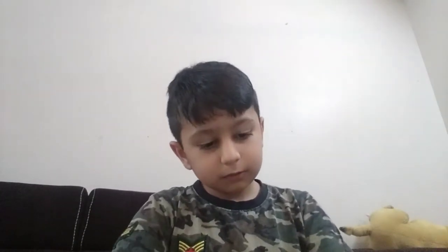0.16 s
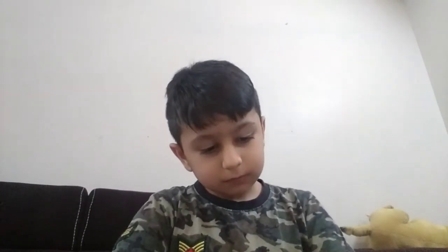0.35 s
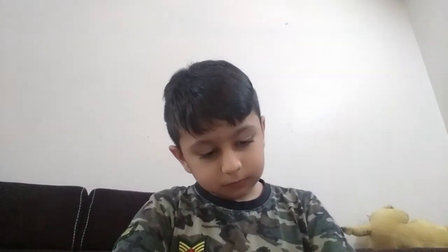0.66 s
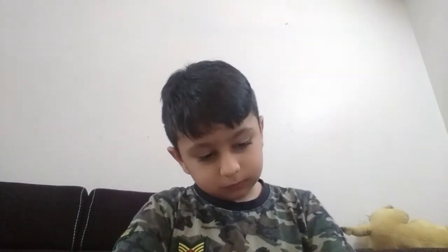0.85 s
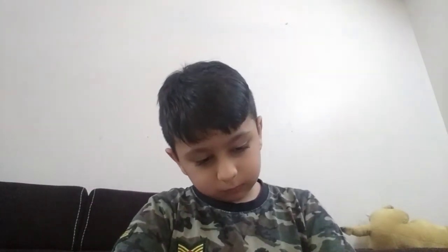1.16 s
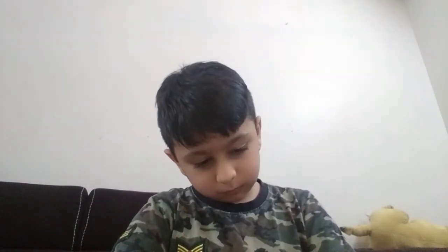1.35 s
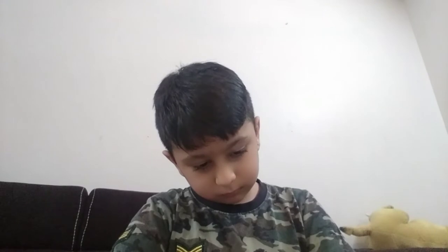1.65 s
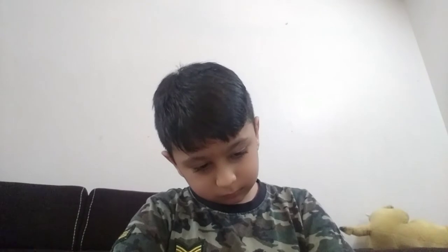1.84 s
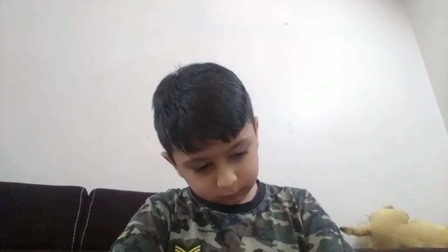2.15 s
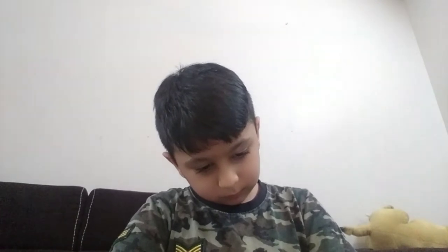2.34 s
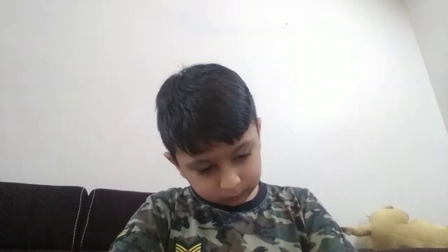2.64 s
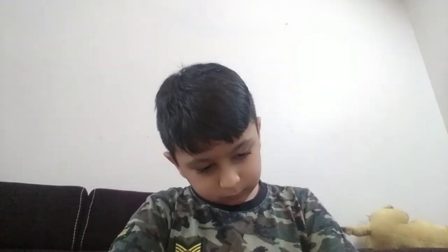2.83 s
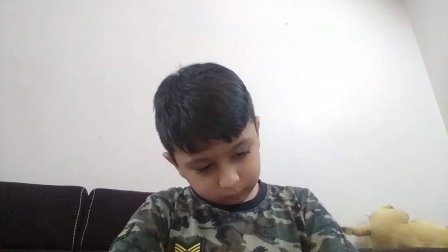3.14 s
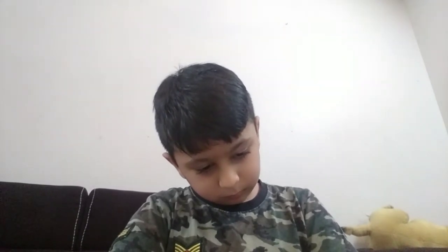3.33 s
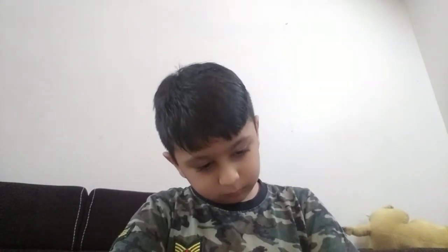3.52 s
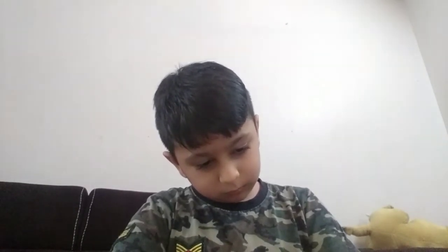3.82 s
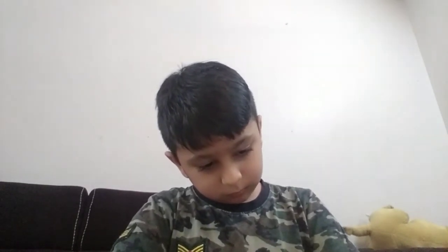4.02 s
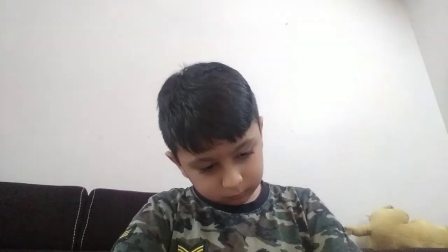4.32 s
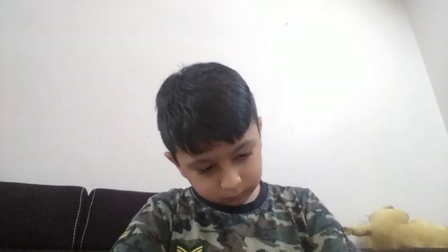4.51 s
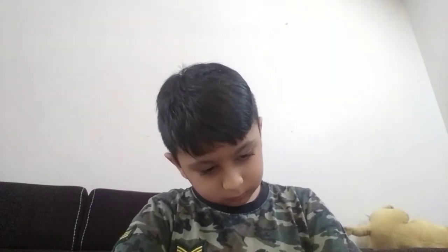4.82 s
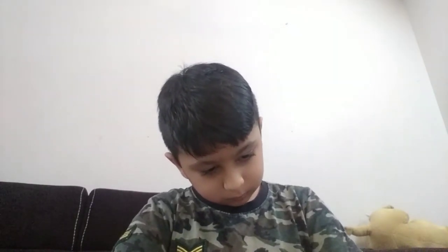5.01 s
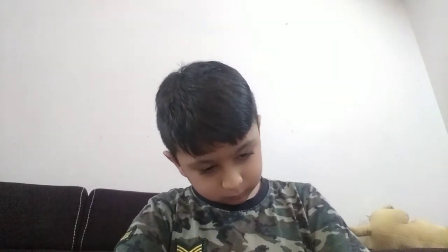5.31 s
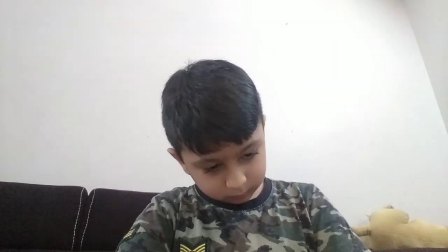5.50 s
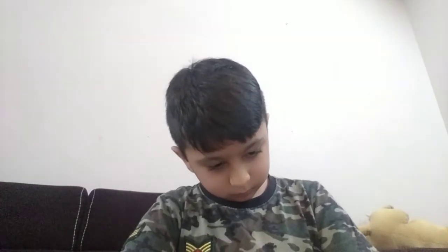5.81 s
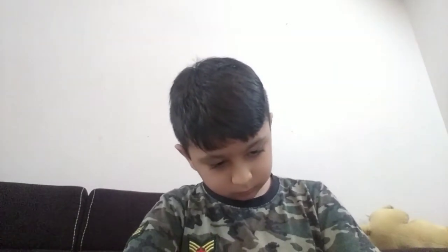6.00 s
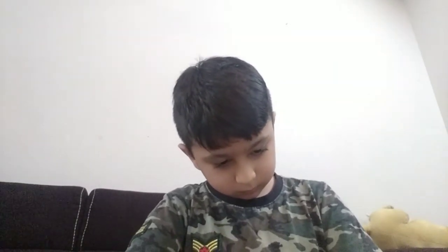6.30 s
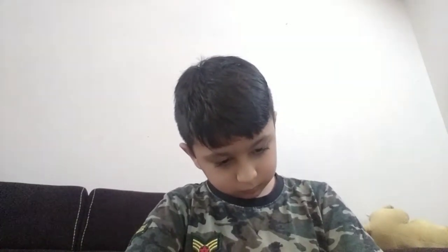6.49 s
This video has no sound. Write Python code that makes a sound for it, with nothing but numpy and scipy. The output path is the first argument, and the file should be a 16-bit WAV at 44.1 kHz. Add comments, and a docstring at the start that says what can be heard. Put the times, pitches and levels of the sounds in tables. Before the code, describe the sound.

A felt-tip pen knocks on a table, then scribbles rapidly on paper, pausing briefly midway and knocking again near the end.

```python
"""In a small, quiet room a felt-tip pen knocks on a table and rattles, then scribbles on paper, pushed and
pulled in turn about nine times a second. Its fibres catch and slip: the tilted nib hisses, at first much
brighter when pushed, it judders and squeaks, and the table murmurs under the rubbing and sways at bumps.
Just past halfway the pen pauses, lands with a light rattle and scribbles on.
Near the end it knocks hard and rattles once more."""
import sys
import numpy as np
from scipy import signal
from scipy.fft import rfft, irfft, next_fast_len
from scipy.io import wavfile
from scipy.ndimage import uniform_filter1d, map_coordinates

SR = 44100
rng = np.random.default_rng(int(sys.argv[2]) if len(sys.argv) > 2 else 0)


def transcribe(u):
    """Save the signal u as a 16-bit wav file named by the first command-line argument.

    u: samples, shape (n,) or (channels, n), limited to [-1, 1]; the rate is SR.
    q: integer samples, one column per channel.
    """
    v = np.clip(np.atleast_2d(u).T, -1, 1)
    q = np.round(v * 32767).astype(np.int16)
    wavfile.write(sys.argv[1], SR, q)


N = 293706


def scribble(bite_s=0.0015, brake=2.28, ease=1.26):
    """Sliding friction: each stroke bites, speeds along and slows, driving hiss, rasp and murmur."""
    low, high, top, drag, murmur, speed = np.zeros((6, N))
    for stroke in strokes():
        s, length, lean_db, bite = stroke["s"], stroke["length"], stroke["lean_db"], stroke["bite"]
        t = np.arange(int(length * SR)) / SR
        attack = bite * np.tanh(t / bite_s) + (1 - bite) * np.tanh(t / stroke["rise"]) ** 2
        friction = unit(attack * (1 - (t / length) ** brake) ** ease)
        arc = np.abs(np.sin(np.pi * t / length))
        dark, bright = amp(stroke["db"]) * unit(amp([-lean_db / 2, lean_db / 2]))
        add(speed, s, arc * amp(-0.3 * lean_db))  # leaning into the paper holds the nib back
        add(low, s, friction * dark)
        add(high, s, friction * bright)
        add(top, s, friction * bright * amp(stroke["treble_db"]))
        add(drag, s, friction * amp(stroke["rasp_db"]))
        add(murmur, s, friction * amp(stroke["murmur_db"]) * np.sqrt(arc))
    rubbing = amp(-0.57) * nib_hiss(low, high, top, speed) + felt_rasp(drag, speed)
    rubbing += amp(-5.0) * table_murmur(murmur)
    tooth = amp(1.37 * wobble(70) + 0.57 * wobble(450))  # the paper's tooth makes the grip uneven
    return tooth * rubbing


def strokes(contact_share=0.93, longest_s=0.11, upright_db=-2, pull_tilt_share=0.26, dig_db=0.57):
    """Reciprocating motion: direction and grip set the attack and colour of each stroke's friction."""
    # Pushes and pulls in turn. Each row: start in seconds, hiss level in dB.
    hand_strokes = [(0.124, -52), (0.298, -60.5), (0.384, -49), (0.49, -47), (0.612, -47), (0.706, -48),
                    (0.814, -48.5), (0.921, -43), (1.023, -47.5), (1.118, -46), (1.234, -47.5),
                    (1.333, -48), (1.448, -49.5), (1.558, -45), (1.636, -48.5), (1.753, -46),
                    (1.838, -48.0), (1.943, -44.0), (2.061, -43.0), (2.167, -44), (2.292, -43.5),
                    (2.4, -42.5), (2.532, -44.0), (2.67, -44.5), (2.81, -45), (2.957, -45.0),
                    (3.064, -46.5), (3.179, -45.5), (3.29, -47), (3.863, -57.0), (3.957, -47), (4.072, -47),
                    (4.183, -46.5), (4.311, -47), (4.418, -46.5), (4.525, -47.0), (4.622, -43.5),
                    (4.732, -45.5), (4.84, -44), (4.957, -43.0), (5.06, -44.0), (5.184, -42.5),
                    (5.304, -42.5), (5.432, -44.0), (5.548, -41.0), (5.66, -43), (5.782, -45),
                    (5.926, -48.0), (6.044, -44.0), (6.166, -45.5), (6.27, -45.5), (6.396, -45),
                    (6.552, -48.5)]
    # How the pen is held. Each row: time in seconds, tilt as a push's extra brightness in dB,
    # rise of a push in seconds, rise of a pull in seconds.
    grip = [(0.12, 6.5, 0.027, 0.016), (0.4, 9, 0.019, 0.063), (1.75, 10.5, 0.023, 0.017),
            (2.06, 6, 0.0054, 0.022), (2.4, 0.5, 0.0044, 0.049), (2.7, 3.5, 0.012, .033),
            (2.96, 0, 0.0064, 0.0055), (3.29, -2, 0.0025, 0.013), (3.96, -1, 0.026, 0.0035),
            (4.18, 2.5, 0.0059, 0.0041), (5.55, 1, 0.0084, 0.0023), (5.8, -0.5, .02, 0.013),
            (6.27, -0.5, 0.028, 0.0041), (6.55, 4, 0.016, 0.014)]
    # The dull parts of the rubbing. Each row: time in seconds, rasp level in dB, murmur level in dB.
    rub_levels = [(0.12, -52.5, -54.5), (0.3, -73, -71.5), (0.7, -58.5, -59), (1.12, -73.5, -71.5),
                  (1.64, -64.5, -65.5), (1.94, -61.5, -68), (2.96, -69, -63), (3.2, -74.5, -74),
                  (3.87, -60, -69.5), (4.4, -61, -61.5), (4.62, -64.5, -62.5), (4.96, -59, -64.5),
                  (5.18, -70.5, -72.5), (5.66, -65, -72), (5.78, -60, -67), (6.17, -71.5, -70.5),
                  (6.55, -74, -71)]
    # The top treble of the pulls. Each row: time in seconds, gain in dB.
    pull_treble = [(2.17, 0), (2.67, -10.5), (2.96, -0.5), (3.18, -3.5), (3.85, 4), (5.66, 1.5),
                   (5.93, -20), (6.17, 0), (6.39, 2)]
    turns = [s for s, _ in hand_strokes[1:]] + [N / SR]
    for k, ((s, db), turn) in enumerate(zip(hand_strokes, turns)):
        push = k % 2 == 0
        tilt_db, push_rise, pull_rise = at(grip, s)
        rasp_db, murmur_db = at(rub_levels, s) + (dig_db if push else -dig_db)  # a pushed nib digs in
        yield dict(s=s, db=db, push=push, tilt_db=tilt_db, rasp_db=rasp_db, murmur_db=murmur_db,
                   length=min(contact_share * (turn - s), longest_s),
                   rise=push_rise if push else pull_rise,
                   bite=0.34 if push else 0.25,  # share of the friction that catches at once
                   lean_db=upright_db + tilt_db * (1 if push else pull_tilt_share),
                   treble_db=0 if push else at(pull_treble, s)[0])


def nib_hiss(low, high, top, speed):
    """Resonance: slipping fibres excite the nib, whose lean shifts the hiss between two bands."""
    # The nib's friction spectrum. Each row: frequency in Hz, relative density in dB.
    nib_spectrum = [(1500, -62.5), (3800, -20), (4750, -9.5), (5200, 0.5), (6100, 1.5), (7200, -1.5),
                    (8500, 1.5), (9400, 0), (10300, -6), (11300, -14.5), (13000, -12.5), (15500, -12.5)]
    fibres = patchy(coloured(slips(rate=30000, spread_db=1.5), nib_spectrum), depth_db=2.5)
    lower = below(fibres, corner_hz=7060, order=12)
    skirt = below(fibres, corner_hz=5080, order=80)
    fizz = fibres - below(fibres, corner_hz=10400, order=24)
    # at speed the hiss spreads further beyond the two resonances
    hiss = low * (lower - skirt + skirt * (0.49 + 0.57 * speed ** 3))
    return hiss + high * (fibres - lower - fizz) + top * fizz * (0.59 + 0.71 * speed)


def felt_rasp(drag, speed):
    """Friction noise widens with speed: the rasp is dull near the turns and opens up in mid-stroke."""
    # The felt's friction spectrum. Each row: frequency in Hz, relative density in dB.
    felt_spectrum = [(900, -48), (1700, -2), (2300, -5.5), (3000, -1.5), (4000, -1.5), (5000, -0.5),
                     (8000, -31)]
    rasp = patchy(coloured(slips(rate=9000, spread_db=3), felt_spectrum), depth_db=5.5)
    dull = below(rasp, corner_hz=3840, order=12)
    return drag * (amp(2.65) * dull + amp(-3.0) * (rasp - dull) * speed ** 2)


def table_murmur(force):
    """Forced vibration: the table radiates the low part of the rubbing."""
    # The rubbed table's spectrum. Each row: frequency in Hz, relative density in dB.
    murmur_spectrum = [(60, -16.5), (200, -12.5), (290, 2.5), (360, 2), (480, -10.5), (620, -1),
                       (780, -0.5), (1000, -5.5), (1400, -10.5), (2500, -27.5)]
    return force * coloured(slips(rate=2500, spread_db=3), murmur_spectrum) * amp(5.2 * wobble(35))


def slips(rate, spread_db):
    """Shot noise: fibres catch and let go in impulses of uneven size, about rate times a second."""
    return (rng.random(N) < rate / SR) * rng.standard_normal(N) * amp(spread_db * rng.standard_normal(N))


def patchy(x, depth_db):
    """Spectral modulation: the paper changes along the path, so the friction's colour keeps shifting."""
    spectra = signal.stft(x, nperseg=256)[2]
    patches = uniform_filter1d(rng.standard_normal(spectra.shape), size=4, axis=0)
    patches = uniform_filter1d(patches, size=14, axis=1)
    return unit(signal.istft(spectra * amp(depth_db * unit(patches)), nperseg=256)[1][:N])


def knocks(crack_t60=0.026, thock_t60=0.015, dent_hz=560, dent_t60=0.0042):
    """Impact excitation: each blow rings the table top; a softer contact leaves out the high modes."""
    # Modes of the table top. Each row: frequency in Hz, relative level in dB, 60 dB decay in seconds.
    table_modes = [(254, -27.5, 0.044), (289, -9.5, 0.086), (357, -10, 0.12), (410, 1.5, 0.025),
                   (566, -24.5, 0.049), (555, -8, 0.025), (690, -13, 0.021), (767, -5, 0.04),
                   (820, -7, 0.033), (1010, -0.5, 0.019), (1170, -6, 0.021), (1530, -9, 0.025),
                   (2480, -12, 0.028), (2884, 4.5, 0.015)]
    out, t = np.zeros(N), np.arange(SR // 3) / SR
    dent = amp(7.5 - 60 * t / dent_t60) * np.sin(2 * np.pi * dent_hz * t)  # the top gives, springs back
    crack_band = signal.butter(1, [1500, 6500], "bandpass", fs=SR, output="sos")
    for s, db, corner_hz, crack_db in contacts():
        ring = sum(amp(level + rng.normal(0, 1.04) - 60 * t / t60)
                   * np.sin(2 * np.pi * hz * t) * (-1) ** k
                   for k, (hz, level, t60) in enumerate(table_modes))
        thock = amp(10.0 - 60 * t / thock_t60) * rng.standard_normal(len(t))  # dense, fast-dying modes
        band = signal.butter(3, [220, np.clip(corner_hz, 400, SR / 4)], "bandpass", fs=SR, output="sos")
        wood = signal.sosfilt(band, dent + amp(-5.0) * ring + thock)
        wood /= np.std(wood[:SR // 200])  # rms 1 over the first 5 ms
        crack = amp(crack_db - 60 * t / crack_t60) * rng.standard_normal(len(t))
        add(out, s, amp(db) * (wood + signal.sosfilt(crack_band, crack)))
    return out


def contacts(bounce_s=0.0125, first_db=-15.5, loss_db=1.5, softening=0.88, extra_crack_db=8):
    """Inelastic rebound: after some blows the pen rattles in ever weaker and softer bounces."""
    # Blows on the table. Each row: start in seconds, level in dB, contact's corner frequency in Hz,
    # crack relative to the blow in dB, length of the rattle in seconds.
    blows = [(0.1151, -45, 870, -40, 0), (0.1252, -34, 485, -32, 0), (0.1293, -23.5, 2080, -21.5, .092),
             (3.456, -70, 604, -18, 0), (3.7, -74, 700, 3, 0), (3.869, -50, 2220, -5, .066),
             (5.783, -57.5, 2540, -6, 0), (6.3982, -30.5, 4040, -3, 0), (6.3994, -23, 1960, 2, .04)]
    for s, db, corner_hz, crack_db, rattle_s in blows:
        yield s, db, corner_hz, crack_db
        for k in range(int(rattle_s / bounce_s)):
            start = s + bounce_s * (k + 1 + rng.uniform(-0.15, 0.15))
            yield start, db + first_db - loss_db * k, corner_hz * softening ** k, crack_db + extra_crack_db


def judders(waver=0.1094, flutter_db=3, cycles=3.0):
    """Stick-slip oscillation: tones swell and fade, their pitch and strength changing every few cycles."""
    out = np.zeros(N)
    for s, length, db, hz in judder_events():
        t = np.arange(int(length * SR)) / SR
        grip, force = (map_coordinates(knots, [t * hz / cycles], mode="mirror")
                       for knots in rng.standard_normal((2, 64)))
        phase = 2 * np.pi * np.cumsum(hz * np.exp(waver * grip)) / SR
        add(out, s, amp(db + flutter_db * force) * np.sin(np.pi * t / length) ** 2 * np.sin(phase))
    return out


def judder_events(chatter_hz=649, chatter_s=0.047, squeak_hz=2386, squeak_s=0.031):
    """Frictional instability: a few strong judders, chatter in each stroke and a squeak in each push."""
    # The nib's strongest judders. Each row: start in seconds, length in seconds, level in dB, pitch in Hz.
    strong_judders = [(0.778, 0.046, -54.5, 668), (1.362, 0.052, -58, 786), (2.694, 0.13, -60.5, 639),
                      (2.98, 0.043, -53.5, 333), (3.868, 0.059, -54, 1110), (4.099, 0.053, -53, 382),
                      (5.777, 0.033, -52.5, 752), (5.778, 0.019, -43.5, 1860)]
    events = list(strong_judders)
    for stroke in strokes():
        s, length = stroke["s"], stroke["length"]
        pitch, force = rng.standard_normal(2)
        chatter_db = stroke["murmur_db"] - 0.5 + 3 * force
        events.append((s + 0.18 * length, chatter_s, chatter_db, chatter_hz * np.exp(0.22 * pitch)))
        if stroke["push"]:  # more tilt, louder squeak
            events.append((s + 0.45 * length, squeak_s, -68.5 + stroke["tilt_db"], squeak_hz))
    return events


def bumps():
    """Low-frequency vibration: a soft push of the hand sways the whole table for a few cycles."""
    # The hand's bumps. Each row: start in seconds, length in seconds, level in dB, pitch in Hz.
    hand_bumps = [(0.123, 0.034, -41, 81.6), (0.191, 0.031, -48, 64.4), (1.254, 0.082, -52, 115),
                  (4.413, 0.062, -51.5, 104), (4.6, 0.15, -63, 101.2), (5.307, 0.16, -54, 99),
                  (5.56, 0.09, -53.5, 101), (5.68, 0.089, -51, 97), (6.394, 0.017, -38.5, 201)]
    out = np.zeros(N)
    for s, length, db, hz in hand_bumps:
        t = np.arange(int(length * SR)) / SR
        add(out, s, amp(db) * np.sin(np.pi * t / length) ** 2 * np.sin(2 * np.pi * hz * t))
    return out


def with_tail(x, wet_db, gap_s=0.0059):
    """Exponential decay: a short tail follows each sound, set to die fastest near 4.4 kHz."""
    # The tail, which leaves the gaps between strokes dark near 4.4 kHz.
    # Each row: frequency in Hz, 60 dB decay in seconds.
    decay_times = [(150, 0.29), (500, 0.2), (2000, 0.4), (4400, 0.07), (5400, 0.18), (9000, 0.29),
                   (11500, 0.079), (15000, 0.18)]
    hz, t, spectra = signal.stft(rng.standard_normal(SR // 2), SR, nperseg=256)
    tail = signal.istft(spectra * amp(-60 * t / along(decay_times, hz)[:, None]), SR, nperseg=256)[1]
    tail *= 1 - np.exp(-(np.arange(len(tail)) / SR / gap_s) ** 2)
    return x + amp(wet_db) * signal.fftconvolve(x, tail / np.linalg.norm(tail))[:N]


def background():
    """Ambient noise: a faint steady floor, and the arm's low rumble swelling with each stroke."""
    # Spectra of the quiet room and of the arm. Each row: frequency in Hz, relative density in dB.
    air_spectrum = [(15, -51.5), (25, -15.5), (101, -3), (193, -11), (227, -9), (399, -15), (495, -15),
                    (552, -26.5), (1850, -25.5), (2420, -29), (15500, -41)]
    arm_spectrum = [(20, -32.5), (50, -9.5), (105, -4.5), (200, -17), (400, -14.0), (1200, -25.5)]
    moving = np.zeros(N)
    for stroke in strokes():
        add(moving, stroke["s"], np.hanning(int(2 * stroke["length"] * SR)))
    arm = coloured(rng.standard_normal(N), arm_spectrum)
    air = coloured(rng.standard_normal(N), air_spectrum)
    return amp(-70.5) * air + amp(-69.5) * moving * arm


def amp(db):
    """Decibels as an amplitude ratio."""
    return 10 ** (np.asarray(db) / 20)


def unit(x):
    """x at rms 1."""
    return x / np.sqrt(np.mean(x ** 2) + 1e-20)


def at(curve, s):
    """The columns of a curve, interpolated at s seconds."""
    times, *columns = np.transpose(curve)
    return np.array([np.interp(s, times, column) for column in columns])


def along(points, hz):
    """(Hz, value) points, interpolated on a logarithmic frequency axis."""
    frequencies, values = np.transpose(points)
    return np.interp(np.log(hz + 1), np.log(frequencies), values)


def filtered(x, response):
    """Linear filtering: the spectrum of x times a frequency response."""
    size = next_fast_len(len(x) + 4096)
    return irfft(rfft(x, size) * response(np.fft.rfftfreq(size, 1 / SR)), size)[:len(x)]


def coloured(x, spectrum):
    """x shaped by a spectrum, at rms 1."""
    return unit(filtered(x, lambda hz: amp(along(spectrum, hz))))


def below(x, corner_hz, order):
    """Low-pass filtering: the part of x under a corner frequency."""
    return filtered(x, lambda hz: 1 / (1 + (hz / corner_hz) ** order))


def wobble(rate):
    """A smooth random curve, rate knots a second."""
    return map_coordinates(rng.standard_normal(int(N * rate / SR) + 4), [np.arange(N) * rate / SR])


def add(track, s, sound):
    """Superposition: mix a sound into a track at s seconds."""
    part = track[max(round(s * SR), 0):][:len(sound)]
    part += sound[:len(part)]


def scene():
    """Pen, table and background add by superposition at one microphone."""
    pen = with_tail(scribble(), wet_db=-6.5)
    table = with_tail(knocks(), wet_db=-15.5, gap_s=0.0027) + with_tail(judders(), wet_db=-6.5) + bumps()
    return (pen + table + background())[None]


def record(dry, top_hz=15830):
    """Band limiting: nothing above the top frequency passes."""
    return np.array([filtered(channel, lambda hz: hz < top_hz) for channel in dry])


dry = scene()
out = record(dry)
transcribe(out)
```